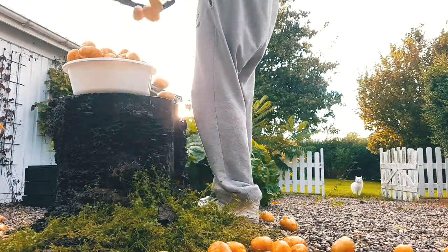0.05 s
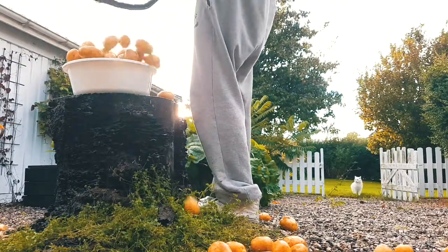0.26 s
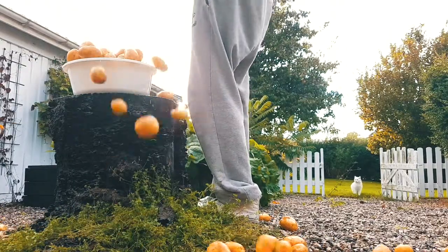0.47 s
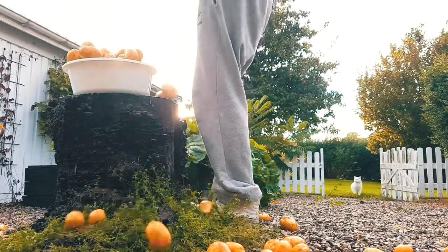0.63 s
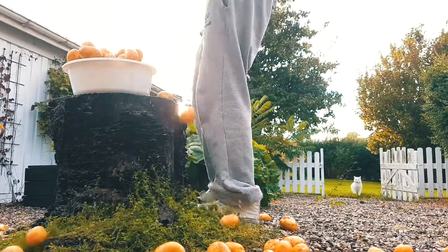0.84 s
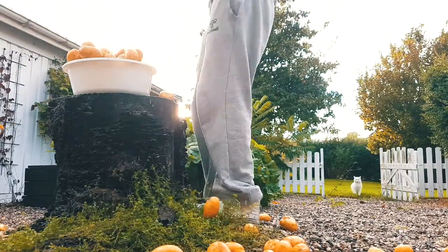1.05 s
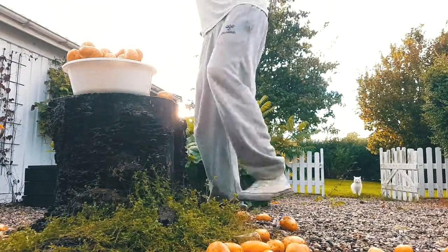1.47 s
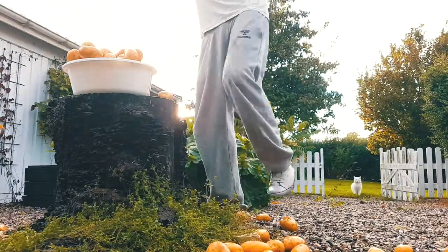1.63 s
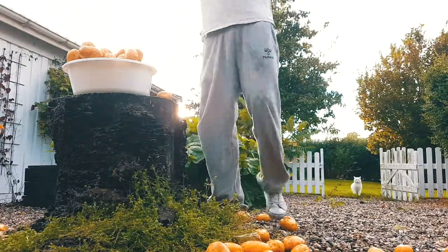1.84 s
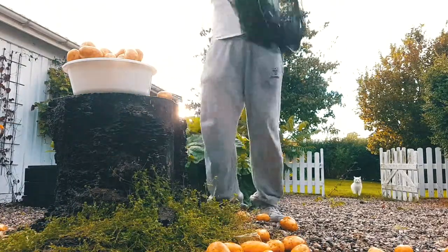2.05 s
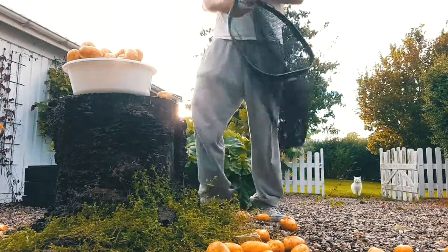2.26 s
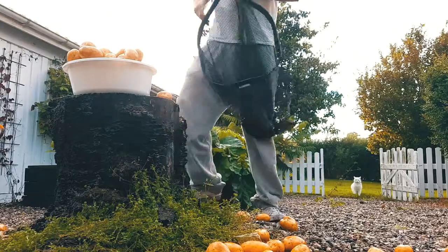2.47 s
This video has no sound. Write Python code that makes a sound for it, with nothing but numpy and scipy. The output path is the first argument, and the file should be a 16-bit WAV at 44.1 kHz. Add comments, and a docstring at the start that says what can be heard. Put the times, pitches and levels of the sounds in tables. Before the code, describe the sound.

Potatoes tumble onto a full plastic tub in a quick run of dull thuds, while others land close by on moss and gravel with small crunches. Then a shoe scuffs and trousers swish softly in a quiet garden.

```python
"""Potatoes tip from a net onto a full plastic tub: each blow rings its damped walls and jostles the heap.
Others spill into moss and gravel close by with a crunch and a thump; twigs snap and loose grit stirs.
Pebbles and the net's frame knock, a shoe scuffs the gravel, trousers and net swish as the person turns.
Quiet garden air lies behind. Rings and thumps are decaying sines; the textures are grainy noise."""
import sys
import numpy as np
from scipy import signal
from scipy.fft import rfft, irfft, next_fast_len
from scipy.io import wavfile
from scipy.ndimage import map_coordinates

SR = 44100
rng = np.random.default_rng(int(sys.argv[2]) if len(sys.argv) > 2 else 0)


def generate_wav(sig):
    """Save sig (samples, or channels by samples) to the path in sys.argv[1] as 16-bit PCM at SR."""
    pcm = np.round(np.clip(np.atleast_2d(sig).T, -1, 1) * 32767).astype(np.int16)
    wavfile.write(sys.argv[1], SR, pcm)


N = 110250
T = np.arange(N) / SR
HIT_T = T[:SR // 4]  # time within one hit

# garden air: f/Hz, level/dB
AIR_SPECTRUM = [(20, -1.5), (90, 3.5), (250, -2), (500, 4), (750, -4.5), (1300, -6.5), (2200, -7),
                (2650, -5), (4800, -15), (6500, -9), (9500, -18.5), (16000, -18.5)]
# level curve of stirring grit and leaves: t/s, level/dB
STIR_CURVE = [(0, -45), (.05, -48), (.09, -47), (.125, -49), (.2, -46), (.28, -53.5), (.39, -46.5),
              (.42, -64), (.52, -58), (.58, -52.5), (.68, -45.5), (.77, -51), (.81, -55.5), (.88, -58),
              (.925, -53), (1.02, -56.5), (1.1, -46), (1.16, -57.5), (1.22, -53.5), (1.5, -65), (1.56, -87)]
# loose grit and leaves: f/Hz, level/dB
GRIT_SPECTRUM = [(100, 2.5), (400, 10.5), (1000, 1), (2200, -1), (3500, 2.5), (5000, 0), (7800, 3),
                 (9500, -4.5), (13000, 1.5), (16000, -7.5)]
# potatoes hitting the ground:
# t/s, crunch level/dB, crunch hold/s, tilt/(dB/octave), settling level/dB, thump level/dB, thump f/Hz
GROUND_HITS = [(0.0614, -32.5, 0.0025, 2.5, -40, -30.5, 240), (0.18, -36, 0.0048, 5, -44, -43, 330),
               (0.298, -42.5, 0.0058, 2, -62, -41, 249), (.348, -33.5, 0.00203, -0.5, -45, -28.5, 240),
               (0.482, -43, 0.0041, 0.5, -56, -39, 302), (0.616, -31, 0.0056, 0.3, -41.5, -48, 260),
               (0.6405, -33.5, 0.0054, 0.5, -40, -44, 130), (0.657, -40, 0.005, 0.5, -44.5, -32, 119.4),
               (0.6863, -41, .004, 0.5, -51, -32.5, 390), (0.69, -33, 0.00079, -1.5, -46.5, -34.5, 138),
               (0.743, -40.5, 0.0016, -0.5, -59, -39.5, 332), (0.7535, -42.5, 0.003, -0.5, -56, -61, 278),
               (0.8238, -29, 0.0012, 5.5, -45, -32.5, 304), (0.8993, -32, 0.003, 4, -45, -43, 220),
               (0.9322, -39.5, 0.0035, 0, -57.5, -44, 427), (1.037, -41.5, 0.00064, 0, -44, -55, 279),
               (1.0729, -30.5, 0.0022, 0.5, -43.5, -37.5, 119), (1.094, -46.5, 0.012, 4.5, -49, -42, 104),
               (1.441, -49, 0.0026, 0, -61.5, -50, 332), (1.4607, -34, 0.0015, 2, -45.5, -31, 300)]
# crushed moss and gravel: f/Hz, level/dB
CRUNCH_SPECTRUM = [(40, -22), (120, -2), (250, 1.5), (500, 0.5), (850, 0), (1100, 2.5), (2000, -1.5),
                   (3400, 0.5), (5000, -3.5), (7800, -0.5), (9500, -6.5), (13000, -4.5), (16000, -14)]
# twigs and grit snapping: t/s, level/dB, centre f/Hz
TWIG_SNAPS = [(0.0618, -25.5, 9100), (0.1825, -27.5, 11200), (.3487, -24.5, 6070), (0.617, -26.5, 6040),
              (0.6428, -23, 5500), (0.6571, -30, 6860), (0.822, -28.5, 8550), (1.0767, -34, 9200),
              (1.2544, -41, 5000), (1.2848, -31.5, 5100), (1.462, -32.5, 4060), (2.3486, -37, 3000),
              (2.371, -45, 4500), (2.3836, -41.5, 4500)]
# colour of a snap: ratio to its centre frequency, level/dB
SNAP_SPECTRUM = [(.03, -2.5), (.25, -10.5), (1, 1), (1.6, -9), (4, -8.5)]
# potatoes hitting the tub: t/s, level/dB, tilt/(dB/octave)
TUB_HITS = [(0.2167, -26, 0), (0.2211, -27.5, -5.5), (0.2395, -4.5, -1), (0.2455, -12, -2),
            (0.2525, -22.5, -2), (0.26, -26, 2.5), (0.2649, -19.5, -0.5), (0.2723, -24, 2.5),
            (0.286, -29, 1.5), (0.2996, -14.5, -1), (0.3098, -26, -4), (.318, -21.5, -2), (.327, -27, -7.5),
            (0.35, -30.5, -3), (.391, -37.5, -3)]
# modes of the loaded tub: f/Hz, level/dB, t60/s
TUB_MODES = [(105, -28.5, 0.115), (173, -19.5, 0.14), (216.5, -15, 0.06), (295, -0.5, 0.037),
             (362, -1, 0.047), (486, -20.5, 0.15), (607, -13, 0.014), (815, -13.5, 0.054),
             (1093, -8.5, 0.032), (1260, -19, 0.054), (1580, -11, 0.03), (2074, -12, 0.026),
             (2200, -11.5, 0.024)]
# potatoes knocking and rubbing in the heap: f/Hz, level/dB
HEAP_SPECTRUM = [(40, -33), (170, 2.5), (420, -6), (600, -1), (810, -9), (950, -6), (1120, -2.5),
                 (1350, -10), (1600, 1), (1900, -10), (2200, -9), (3200, -20.5), (5000, -37.5),
                 (16000, -46)]
# knocks of the net's frame and of pebbles: t/s, level/dB, f/Hz, t60/s
SMALL_KNOCKS = [(0.3486, -27.5, 3645, 0.021), (.9025, -32.5, 3100, 0.02), (1.0707, -39, 1290, 0.026),
                (1.1, -42.5, 478, 0.073), (1.2845, -53, 900, 0.015), (1.462, -39.5, 3310, 0.015),
                (2.01, -48, 1350, 0.02), (2.124, -46, 530, 0.081), (2.243, -41, 840, 0.015),
                (2.309, -39, 940, 0.014), (2.3476, -43, 2500, 0.01), (2.3713, -48, 2450, 0.012),
                (2.383, -44, 2500, 0.012)]
# strokes of trousers and net: t/s, rise/s, hold/s, t60/s, level/dB
CLOTH_STROKES = [(1.06, 0.056, .02, 0.28, -54), (1.15, 0.04, 0.048, 0.56, -49.5),
                 (1.96, 0.034, 0.17, 0.93, -50.5), (2.34, 0.019, 0.25, .4, -60.5)]
# rubbing cloth: f/Hz, level/dB
CLOTH_SPECTRUM = [(210, -43), (300, 1.5), (420, 1.5), (560, 1), (780, -4.5), (1050, -7), (1350, -4.5),
                  (1900, -12), (2800, -12), (5000, -20), (16000, -32)]
# strokes of the shoe: t/s, rise/s, hold/s, t60/s, level/dB
SHOE_STROKES = [(1.235, 0.036, 0.018, 0.087, -45.5), (1.31, 0.0063, .006, 0.083, -48),
                (1.344, 0.0022, .004, 0.12, -52), (1.378, 0.0037, 0.035, 0.11, -58.5),
                (1.778, 0.0017, 0.0035, 0.094, -53), (1.8, 0.019, 0.23, 0.23, -64),
                (1.963, 0.045, 0.023, 0.19, -51), (2.03, 0.13, 0.11, 0.52, -56),
                (2.345, 0.023, 0.028, 0.72, -60.5)]
# a sole on gravel: f/Hz, level/dB
SOLE_SPECTRUM = [(100, -30), (500, 0), (1200, 1.5), (2000, -2.5), (3600, 2), (5000, -3), (7500, -1),
                 (9500, -9), (13000, -3.5), (16000, -13.5)]
# stereo width: f/Hz, left-right correlation
CORRELATION = [(30, 0.67), (120, 0.95), (350, 0.66), (700, 0.78), (1300, 0.58), (2200, 0.2), (3500, -0.067),
               (12000, 0.079)]
# stereo balance: f/Hz, left minus right level/dB
BALANCE = [(100, -0.5), (700, -1.5), (1700, -1), (3600, -7.5), (5000, -4.5), (7400, -4.5), (9400, 1),
           (11500, 1), (16000, -5.5)]

SETTLE_RISE_S = 0.016  # heap and grit start moving just after a hit


def amp(db):
    """Decibels to gain."""
    return 10 ** (np.asarray(db) / 20)


def curve_at(points, hz):
    """Read a curve on a log frequency axis."""
    freqs, values = np.transpose(points)
    return np.interp(np.log(hz + 1), np.log(freqs + 1), values)


def pan(hz):
    """Left and right gains at these frequencies."""
    return amp(curve_at(BALANCE, hz) * np.array([[0.5], [-0.5]]))


def add(out, start, x):
    """Mix x into out from start seconds on."""
    part = out[:, round(start * SR):][:, :x.shape[-1]]
    part += x[..., :part.shape[1]]


def swell(t, rise, hold, t60):
    """Linear rise, hold and exponential release, all in seconds."""
    return np.clip(t / rise, 0, 1) * amp(-60 * np.maximum(t - rise - hold, 0) / t60)


def strokes(rows):
    """The summed envelope of rubbing strokes."""
    return sum(amp(db) * swell(T - start, rise, hold, t60) for start, rise, hold, t60, db in rows)


def flutter(rate_hz, depth_db):
    """A gain gliding through rate_hz random values a second."""
    return amp(depth_db * map_coordinates(rng.standard_normal(N // 20), [T * rate_hz], mode="wrap"))


def low_cut(x, hz):
    """A gentle high-pass."""
    return signal.sosfilt(signal.butter(2, hz, "highpass", fs=SR, output="sos"), x)


def grains(spectrum, size, spiky_db, tilt=0):
    """Stereo noise of rms 1: 8-sample grains scattered in level by spiky_db, then coloured."""
    m = next_fast_len(size + 2048)
    hz = np.fft.rfftfreq(m, 1 / SR)
    grain_db = spiky_db * np.minimum(rng.standard_normal(m // 8 + 1), np.pi)
    noise = rng.standard_normal((2, m)) * np.repeat(amp(grain_db), 8)[:m]
    colour = amp(curve_at(spectrum, hz) + tilt * np.log2(hz + 1))
    width = np.arccos(np.clip(curve_at(CORRELATION, hz), -1, 1)) / 2
    mid, side = rfft(noise) * colour * [np.cos(width), np.sin(width)]
    x = irfft(np.array([mid + side, mid - side]) * pan(hz), m)[:, :size]
    return x / np.sqrt(np.mean(x ** 2))


def from_left(x, lead_s=0.00013):
    """Sound from the left reaches the left microphone first."""
    m = next_fast_len(N + SR // 2)
    shift = np.exp(1j * np.pi * np.fft.rfftfreq(m, 1 / SR) * lead_s * np.array([[1], [-1]]))
    return irfft(rfft(x, m) * shift, m)[:, :N]


def garden_air():
    """A faint, almost steady bed of dark noise."""
    return amp(-58.5) * flutter(rate_hz=2.3, depth_db=0.06) * grains(AIR_SPECTRUM, N, spiky_db=4)


def stirring_grit():
    """Rolling potatoes keep grit and leaves crackling."""
    level = amp(np.interp(T, *np.transpose(STIR_CURVE)))
    return level * flutter(rate_hz=170, depth_db=3) * grains(GRIT_SPECTRUM, N, spiky_db=3)


def landings():
    """A potato crushes moss and gravel, thumps the soil, and the grit settles."""
    out = np.zeros((2, N))
    for start, crunch_db, hold, tilt, settle_db, thump_db, hz in GROUND_HITS:
        crunch = grains(CRUNCH_SPECTRUM, len(HIT_T), spiky_db=2, tilt=tilt)
        crunch *= swell(HIT_T, rise=0.0024, hold=hold, t60=0.025)
        settle = grains(CRUNCH_SPECTRUM, len(HIT_T), spiky_db=3, tilt=tilt)
        settle *= swell(HIT_T, SETTLE_RISE_S, hold=0, t60=0.19)
        phase = 2 * np.pi * hz * HIT_T
        thump = np.sin(phase) + amp(-7.5) * np.sin(1.69 * phase)  # one inharmonic overtone
        thump *= swell(HIT_T, rise=0.0032, hold=0, t60=4.6 / hz)  # gone in 4.6 cycles
        add(out, start, amp(crunch_db) * crunch + amp(settle_db) * settle + amp(thump_db) * thump)
    return low_cut(out, hz=75)


def twig_snaps():
    """Twigs and grit give way with a broad click about a millisecond long."""
    out = np.zeros((2, N))
    envelope = swell(HIT_T, rise=0.00015, hold=0.00028, t60=0.0037)
    for start, db, hz in TWIG_SNAPS:
        click = grains(np.multiply(SNAP_SPECTRUM, [hz, 1]), len(HIT_T), spiky_db=-5)
        add(out, start, amp(db) * click * envelope)
    return out


def tub_thuds():
    """Each blow rings the damped tub and knocks the heap, which jostles on."""
    out = np.zeros((2, N))
    hz, mode_db, t60 = np.transpose(TUB_MODES)[:, :, None]
    attack = 1 - np.exp(-(HIT_T / 0.0018) ** 2)
    modes = np.sin(2 * np.pi * hz * HIT_T) * amp(-60 * HIT_T / t60) * attack
    bump = swell(HIT_T, rise=0.0018, hold=0, t60=0.034)
    jostle = amp(-11.5) * swell(HIT_T, SETTLE_RISE_S, hold=0, t60=0.2)
    for start, db, tilt in TUB_HITS:
        scatter_db = 3 * rng.standard_normal(hz.shape)  # no two blows ring alike
        gains = amp(mode_db + tilt * np.log2(hz / hz[4]) + scatter_db)
        ring = pan(hz[:, 0]) @ (gains * modes)
        heap = grains(HEAP_SPECTRUM, len(HIT_T), spiky_db=1.5, tilt=tilt) * (bump + jostle)
        add(out, start, amp(db) * (ring + amp(-11) * heap))
    return low_cut(out, hz=88)  # the small tub radiates little bass


def knocks():
    """The net's frame and pebbles knock: a brief, dry ring with a rattle around its pitch."""
    out = np.zeros((2, N))
    octaves = np.array([-3, -1, -0.27, 0, 0.27, 1, 3])
    band_db = [-49, -24.5, -5.5, 0, -5.5, -24.5, -49]
    for start, db, hz, t60 in SMALL_KNOCKS:
        ring = amp(-3.5) * pan(hz) * np.sin(2 * np.pi * hz * HIT_T)
        band = np.column_stack([hz * 2 ** octaves, band_db])
        rattle = amp(-1.5) * grains(band, len(HIT_T), spiky_db=3)
        add(out, start, amp(db) * (ring + rattle) * swell(HIT_T, rise=0.00064, hold=0, t60=t60))
    return out


def cloth_swishes():
    """Trousers and net rub in soft, dull strokes."""
    return strokes(CLOTH_STROKES) * grains(CLOTH_SPECTRUM, N, spiky_db=4)


def shoe_scuffs():
    """A sole drags over gravel in rough, gritty strokes."""
    roughness = flutter(rate_hz=51, depth_db=1.5)
    return strokes(SHOE_STROKES) * roughness * grains(SOLE_SPECTRUM, N, spiky_db=3)


def scene():
    """Potatoes on the left, the person ahead, still garden air all around."""
    air = garden_air()
    potatoes = from_left(tub_thuds() + landings())
    return air + potatoes + stirring_grit() + shoe_scuffs() + cloth_swishes() + twig_snaps() + knocks()


def record(dry):
    """A brick-wall low-pass trims the very top."""
    m = next_fast_len(N + SR // 2)
    passband = np.fft.rfftfreq(m, 1 / SR) < 16100
    return irfft(rfft(dry, m) * passband, m)[:, :N]


dry = scene()
out = record(dry)
generate_wav(out)
```